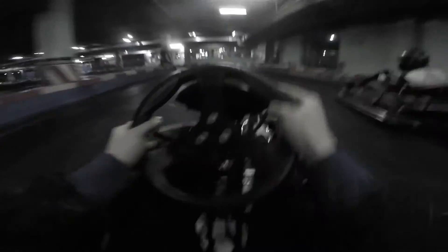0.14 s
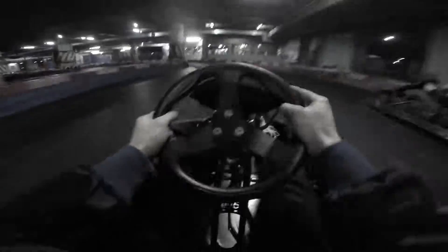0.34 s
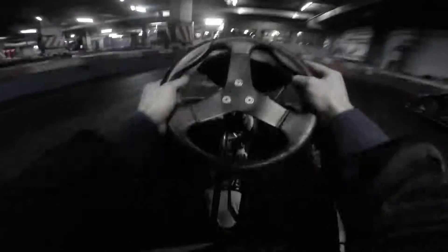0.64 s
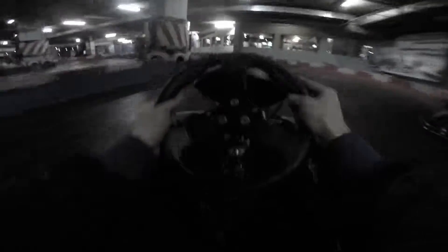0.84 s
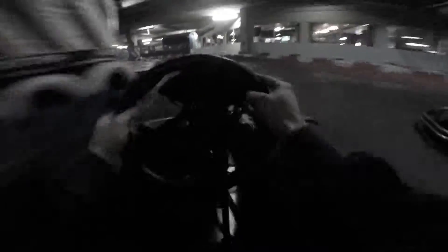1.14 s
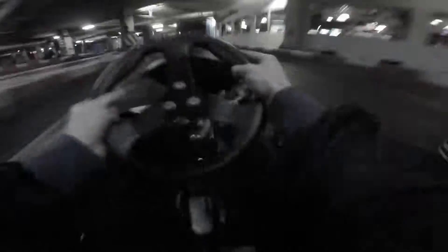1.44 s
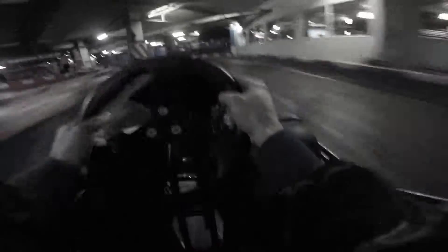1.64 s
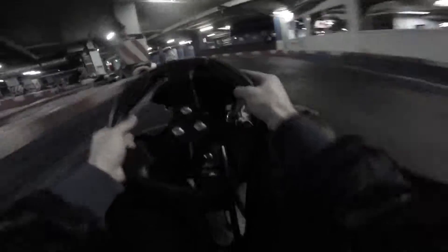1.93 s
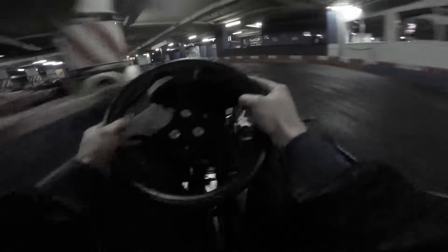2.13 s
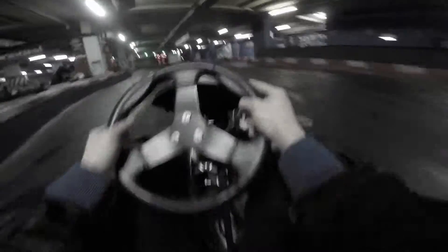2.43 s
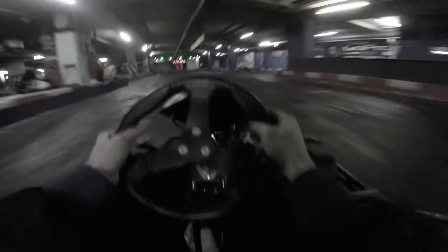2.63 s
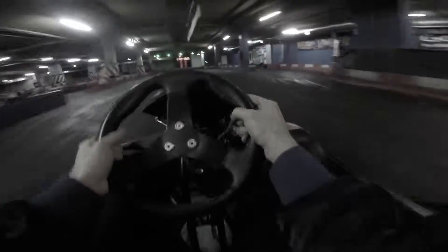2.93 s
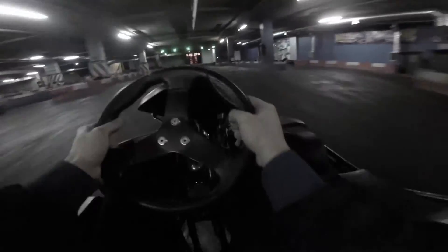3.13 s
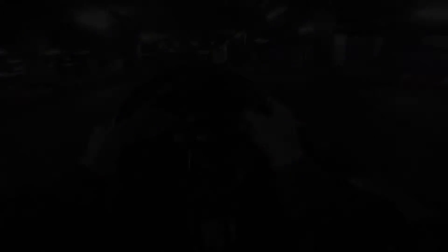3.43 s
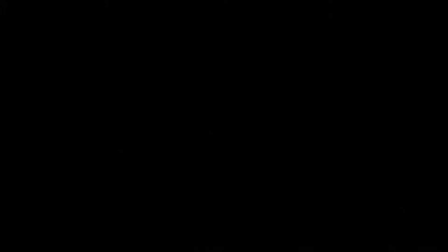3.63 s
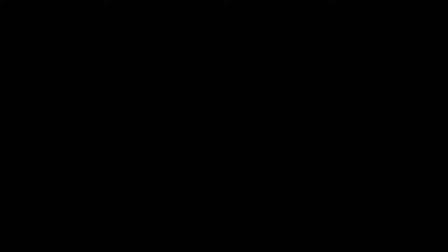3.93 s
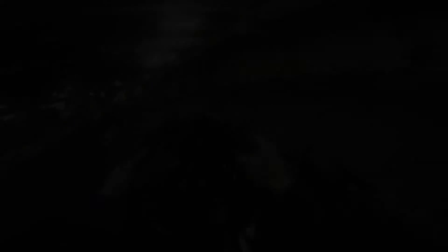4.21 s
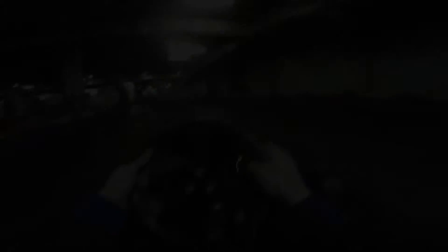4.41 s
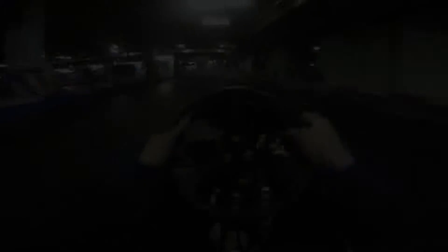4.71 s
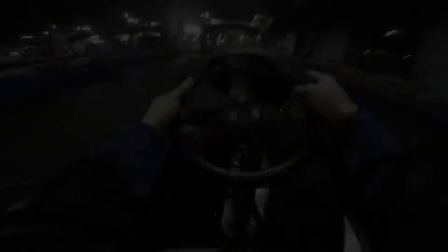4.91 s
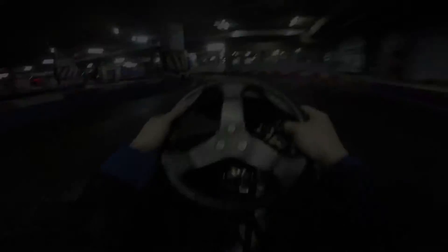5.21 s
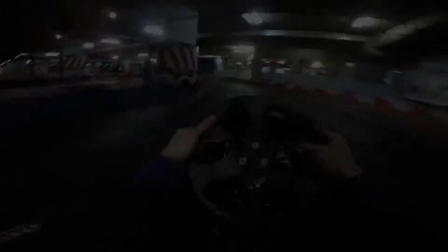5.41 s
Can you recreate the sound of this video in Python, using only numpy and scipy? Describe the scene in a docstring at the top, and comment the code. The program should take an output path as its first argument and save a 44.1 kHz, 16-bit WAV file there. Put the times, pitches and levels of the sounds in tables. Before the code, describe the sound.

Close onboard sound of a go-kart in a concrete hall, the microphone muffled inside a housing on the driver. Dense tinny panel rattle rides over a buzzing exhaust drone, rising slightly in pitch, with deep frame shake and floor rumble. Very short high brake squeaks flick past. It fades quickly to half a second of silence, then creeps back, quieter, to the end.

```python
"""First one hears hard rattle and a drone: onboard a go-kart in a concrete hall, the microphone shut in
a camera housing on the driver. Knocks ring tin panels, the crank of a one-cylinder four-stroke rocks the
frame, exhaust partials drone over gas noise, and the brake disc squeaks in short sliding tones. Behind
lie floor rumble and fan whine. A fader closes, rests, then opens slowly and only partly on another lap."""
import sys
import numpy as np
from scipy import signal
from scipy.fft import rfft, irfft
from scipy.io import wavfile
from scipy.ndimage import uniform_filter1d

SR = 44100
rng = np.random.default_rng(int(sys.argv[2]) if len(sys.argv) > 2 else 0)


def wrap_up_sound(samples):
    """Save the sound to the file named by the first command line argument, as 16-bit audio."""
    columns = np.atleast_2d(samples).T
    # keep every value between -1 and 1, then stretch to whole-number steps
    tamed = np.clip(columns, -1, 1)
    steps = np.round(tamed * 32767).astype(np.int16)
    wavfile.write(sys.argv[1], SR, steps)


N = 245195

# engine run, the second lap starting while the fader is shut:
# [t/s, firing rate f/Hz, throttle 0-1, exhaust re clatter level/dB]
ENGINE_RUN = [(0, 30.28, 0.7, -3.5), (.3, 30.82, .9, -4.5), (.55, 31.79, 1, -6), (.8, 32.4, 1, -5),
              (1.1, 33.22, .8, -4.5), (1.5, 34.19, .4, -5), (1.72, 34.09, .1, -9), (1.9, 33.54, 0.3, -4.5),
              (2.3, 34.35, .2, -3.5), (2.9, 34.59, 0, -6.5), (3.51, 34.71, 0, -6.5),
              (4.03, 32.59, 0.95, -7), (4.35, 32.13, 0.98, -2.5), (4.75, 32.59, 1, -3.5),
              (4.95, 32.93, 0.6, -2.5), (5.2, 33.52, .5, -3.5), (5.35, 32.6, 0, -5.5),
              (5.56, 33.5, 0.4, -5)]
# broad colour of the clatter through the housing: [f/Hz, relative level/dB per Hz]
CLATTER_COLOUR = [(290, -40), (500, -13.5), (628, -18.5), (949, -13), (1130, -18), (1430, -5.5), (2080, -6),
                  (2430, 0.5), (3570, -16.5), (4540, -14.5), (5170, -24.5), (6400, -20), (8030, -45),
                  (10500, -42.5), (15000, -56.5)]
# ringing panels and housing: [f/Hz, width f/Hz, relative level/dB]
PANEL_RINGS = [(1601, 380, -10.5), (1730, 300, -7.5), (2317, 270, 0.5), (2513, 160, -1), (3157, 370, -13),
               (4080, 500, -21), (5676, 570, -19.5), (6350, 1000, -23), (7600, 1500, -32), (8610, 540, -31),
               (9230, 300, -27.5), (10310, 1400, -29), (11400, 460, -38), (12400, 600, -36),
               (13300, 810, -39.5), (13900, 850, -41), (14830, 700, -44.5)]
# crank shake in the seat: [t/s, level/dB re clatter]
SHAKE_LEVEL = [(0, -0.5), (.16, -14), (.27, 2), (.62, 2.5), (.85, 5.5), (1.22, 6), (1.34, 1), (1.45, 6.5),
               (1.58, 3.5), (1.66, -4), (1.82, -5), (1.93, 4), (2.25, 1), (2.43, 5.5), (2.5, -6),
               (2.63, -1.5), (2.88, 5.5), (2.93, -4.5), (3.2, 3), (3.36, 0.5), (3.5, 1.5), (4.03, 6),
               (4.2, 7), (4.33, -1), (4.53, 6), (4.62, 3), (5.07, 8.5), (5.17, -0.5), (5.4, 6), (5.56, 7)]
# exhaust partials: [multiple of the firing rate, level/dB pulling at full throttle,
# level/dB held back by the governor]
EXHAUST_PARTIALS = [(1, -15.5, -14.5), (3, -30, -22), (4, -17, -18.5), (5, -15.5, -14), (6, -26, -14),
                    (7, -13, -20), (8, -20.5, -13), (9, -18.5, -13.5), (10, -13, -12.5), (11, -9.5, -21),
                    (12, -23.5, -12), (13, -9, -20.5), (14, -26.5, -21.5), (15, -30, -32.5),
                    (16, -22.5, -26.5)]
# eighth exhaust partial over its usual strength: [t/s, level/dB]
EIGHTH_PARTIAL_BOOM = [(.7, -3), (.92, 13), (1.1, -7), (1.7, 8), (2.0, -5), (2.9, 2.5), (3.5, 4),
                       (4.6, -7.5), (5.2, 0), (5.3, 9), (5.56, 11.5)]
# gas rush under the partials: [f/Hz, relative level/dB per Hz]
GAS_COLOUR = [(47, -34), (80, 2), (95, -10.5), (119, -14.5), (227, -11), (321, -13.5), (421, -10.5),
              (611, -27.5), (700, -27), (910, -47.5), (1540, -120)]
# brake squeaks: [t/s, peak level/dB before the fader, mid pitch f/Hz, length t/s, octave re squeak level/dB]
BRAKE_SQUEAKS = [(.18, -33, 6450, 0.018, -28), (.199, -27, 6270, 0.019, -26.5),
                 (.2653, -32, 5900, 0.013, -21), (0.331, -26, 6520, 0.027, -25),
                 (0.628, -29.5, 6600, 0.03, -19), (0.774, -34, 6660, .014, -23.5),
                 (0.99, -34, 6640, 0.012, -22), (1.128, -35, 6550, 0.014, -23),
                 (1.283, -33.5, 6660, 0.017, -10), (1.297, -30, 6600, .016, -19.5),
                 (1.419, -24, 6550, .015, -20.5), (1.4274, -27, 6665, .013, -18),
                 (1.437, -27.5, 6470, 0.015, -22), (1.582, -30, 6350, .018, -24),
                 (1.648, -36, 7020, .011, -25), (1.68, -34, 6940, .013, -23.5),
                 (1.695, -27.5, 6450, .018, -27), (1.708, -28, 6283, .014, -27),
                 (2.1204, -33, 6200, .012, -25), (2.23, -32, 6560, .016, -26.5),
                 (2.658, -27.5, 6530, 0.017, -23), (2.887, -22.5, 6400, 0.015, -27.5),
                 (2.9, -27, 6482, .015, -27), (2.9903, -29, 6600, .015, -28),
                 (3.0111, -31.5, 6040, 0.0067, -24), (3.109, -29.5, 7050, 0.0089, -25),
                 (3.132, -28.5, 6380, .013, -24.5), (3.19, -35, 6470, 0.011, -22),
                 (3.2236, -29.5, 6900, .012, -24), (3.234, -30.5, 6220, 0.012, -24),
                 (3.272, -34, 6090, .012, -23), (4.4747, -32, 7050, .012, -22),
                 (4.7785, -32, 7200, 0.012, -22), (5.154, -30, 7110, .011, -26)]
# floor seams that swell the rumble: [t/s at the peak, level/dB, length t/s]
FLOOR_SEAMS = [(.11, 12, .08), (.4, 7, 0.12), (.85, 9, 0.33), (1.6, 7.5, 0.54), (2.88, 7, 0.096),
               (4.54, 12, .12), (5.238, 19.5, 0.065)]
# colour of the floor thumps: [f/Hz, relative level/dB]
THUMP_COLOUR = [(8, -14.0), (18, 0), (26, -5.5), (34, -6.5), (45, -2.5), (56, -6)]
# fan whine: [t/s, level/dB re clatter]
WHINE_LEVEL = [(0, -23), (.22, -20), (.45, -28), (.88, -18), (1.05, -25), (1.75, -29), (2.15, -15.5),
               (2.5, -29.5), (2.7, -26), (3.05, -20), (3.4, -27.5), (4.35, -32), (4.55, -17), (4.75, -28),
               (4.95, -20), (5.2, -27), (5.56, -21)]

CLATTER_DB, RUMBLE_DB = -21.5, -8.5  # clatter before the fader; rumble re clatter
FAN_MULTIPLE = 28  # blade passes per firing cycle
SLIDE_HZ_PER_S = 8400  # upward slide of each squeak
# fainter squeaks at random moments
FAINT_PER_S, FAINT_DB, FAINT_OCTAVE_DB = 2.3, -42, -24
FAINT_HZ, FAINT_SPREAD_HZ, FAINT_S = 6440, 84, 0.012
# fader: a straight close, a rest, a slow opening whose full travel lies beyond the end
CLOSING_S, SHUT_S, OPENS_S = 0.25, 3.519, 4.012
OPENING_S, OPENING_POWER = 7.25, 0.95
TOP_HZ = 15280  # upper edge of the sound


def undb(db):
    """Decibels to gain."""
    return 10 ** (np.asarray(db) / 20)


def unit(x):
    """Scale to rms 1."""
    return x / np.sqrt(np.mean(x ** 2))


def walk(rate):
    """Wandering level: random values held 1 / rate s and smoothed twice; spread about 0.8."""
    k = int(SR / rate)
    held = np.repeat(rng.standard_normal(N // k + 1), k)
    return 1.04 * uniform_filter1d(uniform_filter1d(held, k), k)[:N]


def colour(x, table):
    """Filter by (f/Hz, level/dB) points joined on a log frequency axis."""
    hz, db = np.transpose(table)
    f = np.maximum(np.arange(N // 2 + 1) * SR / N, 1)
    gain_db = np.interp(np.log(f), np.log(hz), db, left=-90, right=-90)
    return irfft(rfft(x) * undb(gain_db), N)


def ring_twice(x, hz, width):
    """The same resonance passed twice, gain 1 at its centre."""
    b, a = signal.iirpeak(hz, hz / width, fs=SR)
    return signal.lfilter(b, a, signal.lfilter(b, a, x))


def read(table):
    """Join each column of a table with straight lines over time."""
    s, *columns = np.transpose(table)
    return [np.interp(np.arange(N) / SR, s, c) for c in columns]


def knocks(cycle, hz=1000):
    """Random knocks whose density and strength pulse with the firing and crank turns."""
    # the higher the ring, the more it follows the valve train
    depth = 0.14 * (hz / 2000) ** 0.2
    turn = 2 * np.pi * cycle + 2.8 * rng.random()
    beat = (1 + depth * np.cos(turn)) * (1 + 0.26 * depth * np.cos(2 * turn))
    taps = rng.random(N) < 2500 * beat ** 2 / SR  # separate harder knocks, about 2500 a second
    unsteady = undb(1.0 * walk(300) + 1.1 * walk(30))
    return rng.standard_normal(N) * (beat + 2.3 * taps) * unsteady


def clatter(cycle):
    """Dense knocks of valves, chain and tin excite the panels, each resonance wavering on its own."""
    rings = 0
    for hz, width, db in PANEL_RINGS:
        panel = ring_twice(knocks(cycle, hz), hz, width)
        rings = rings + undb(db + 0.98 * walk(10)) * panel
    broad = unit(colour(knocks(cycle), CLATTER_COLOUR))
    return unit(broad + undb(-1.0) * unit(rings))


def shake(cycle):
    """The unbalanced crank rocks the frame twice a firing cycle; the frame adds a hollow boom."""
    boom = unit(ring_twice(rng.standard_normal(N), 76, 30))
    wander, flutter = 0.55 * walk(18), undb(1.2 * walk(25))
    rocking = np.sin(2 * (2 * np.pi) * cycle + wander) * flutter
    return unit(rocking + undb(-18.5) * boom)


def exhaust(cycle, throttle, boom_db):
    """Firing-rate partials reweighted by load, wavering as the hall's echoes shift, over rushing gas."""
    drone, load = 0, np.clip(throttle, 0, 1)
    for k, pull_db, held_db in EXHAUST_PARTIALS:
        db = load * pull_db + (1 - load) * held_db + (k == 8) * boom_db + 2.5 * walk(6.4)
        # phase growing with the square of the multiple spreads the pulse
        phase = 0.0715 * k ** 2 + 0.9 * walk(12)
        drone = drone + undb(db) * np.sin(2 * np.pi * k * cycle + phase)
    puff = 1 + 0.12 * np.cos(2 * np.pi * cycle)
    gas = unit(colour(puff * rng.standard_normal(N), GAS_COLOUR))
    return unit(drone) + undb(-2.0) * gas


def faint_squeaks():
    """Weaker brake squeaks at random moments, in the columns of the brake table."""
    starts = np.cumsum(rng.exponential(size=60)) / FAINT_PER_S
    rows = []
    for s, (a, b) in zip(starts, rng.standard_normal((60, 2))):
        if s < N / SR:
            rows.append((s + 0.0056, FAINT_DB + 1.5 * a, FAINT_HZ + FAINT_SPREAD_HZ * b,
                         FAINT_S, FAINT_OCTAVE_DB))
    return rows


def squeaks():
    """Short rubbed tones of the brake disc that swell, slide up and waver, each with a scratch around it."""
    out = np.zeros(N + SR)
    scratch = unit(ring_twice(rng.standard_normal(N + SR), 6700, 1100))
    for s, db, hz, length, octave_db in BRAKE_SQUEAKS + faint_squeaks():
        t = np.arange(int(length * SR)) / SR
        angle = 2 * np.pi * (hz * t + SLIDE_HZ_PER_S / 2 * t * (t - length))
        i = int((s - 0.003) * SR)  # starts 3 ms ahead of the listed moment
        tone = np.sin(angle) + undb(octave_db) * np.sin(2 * angle)
        tone = tone + undb(-11.5) * scratch[i:i + len(t)]
        swell = np.sin(np.pi * (t / length) ** 0.46) ** 2  # a quick catch, a slower release
        out[i:i + len(t)] += undb(db) * swell * tone
    return out[:N] * undb(0.88 * walk(440))


def rumble():
    """Floor seams and tyre thumps come up through the seat as low noise, evened out in level."""
    thumps = colour(rng.standard_normal(N), THUMP_COLOUR)
    power = uniform_filter1d(thumps ** 2, size=SR // 8)
    return unit(thumps / np.sqrt(power + 1e-9))


def seam_swells():
    """Smooth rises in dB around each floor seam."""
    t = np.arange(N) / SR
    return sum(db * np.cos(np.pi * np.clip((t - s) / length, -0.5, 0.5)) ** 2
               for s, db, length in FLOOR_SEAMS)


def fan(cycle):
    """A thin, unsteady whine where the flywheel's blades pass."""
    flutter, wander = undb(3 * walk(20)), 1.4 * walk(30)
    return flutter * np.sin(2 * np.pi * FAN_MULTIPLE * cycle + wander)


def scene():
    """Engine, frame, brake and floor as they reach the housing."""
    hz, throttle, exhaust_db = read(ENGINE_RUN)
    (shake_db,), (boom_db,), (fan_db,) = read(SHAKE_LEVEL), read(EIGHTH_PARTIAL_BOOM), read(WHINE_LEVEL)
    cycle = np.cumsum(hz * (1 + 0.0034 * walk(30))) / SR  # firing cycles run so far
    kart = clatter(cycle) + undb(shake_db) * shake(cycle)
    kart = kart + undb(exhaust_db) * exhaust(cycle, throttle, boom_db)
    kart = kart + undb(RUMBLE_DB + seam_swells() + 2.1 * walk(9.7)) * rumble()
    kart = kart + undb(fan_db) * fan(cycle)
    return (undb(CLATTER_DB + 0.3 * walk(8)) * kart + squeaks())[None]


def record(dry):
    """The fader shuts between the laps; a steep low-pass cuts the top."""
    t = np.arange(N) / SR
    closing = np.clip((SHUT_S - t) / CLOSING_S, 0, 1)
    opening = np.clip((t - OPENS_S) / OPENING_S, 0, 1) ** OPENING_POWER
    low_pass = signal.ellip(14, 0.2, 70, TOP_HZ, fs=SR, output="sos")
    return signal.sosfilt(low_pass, dry * (closing + opening))


dry = scene()
out = record(dry)
wrap_up_sound(out)
```